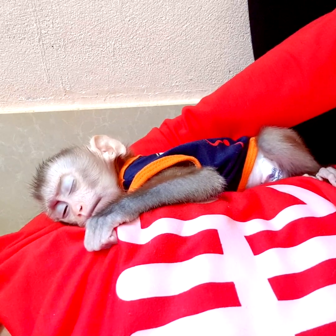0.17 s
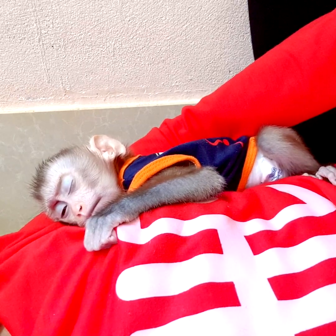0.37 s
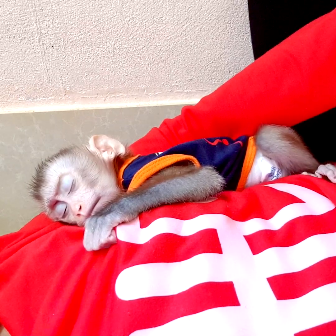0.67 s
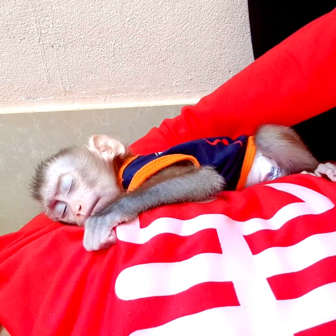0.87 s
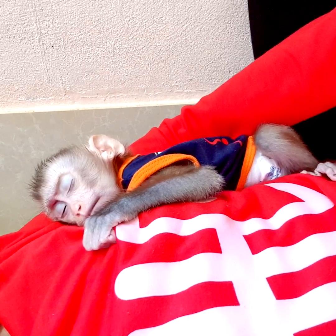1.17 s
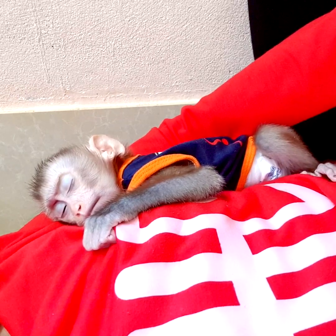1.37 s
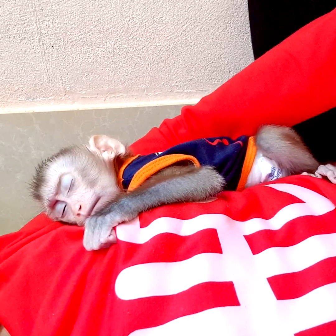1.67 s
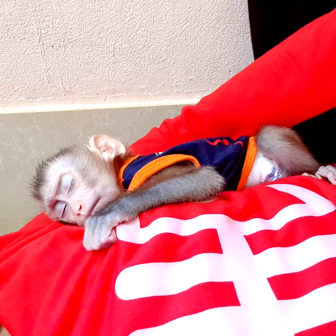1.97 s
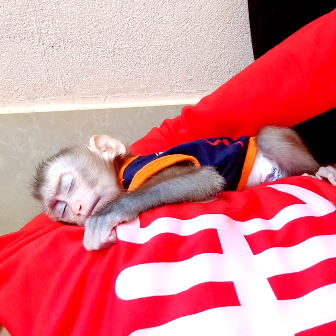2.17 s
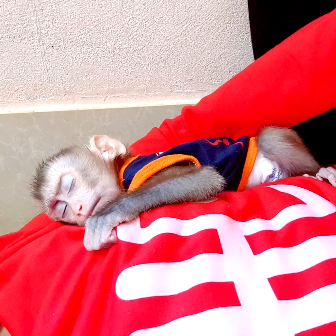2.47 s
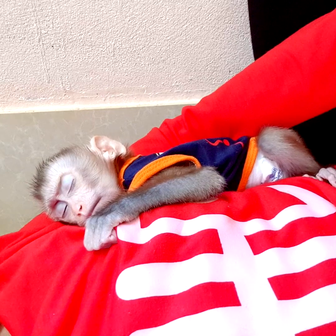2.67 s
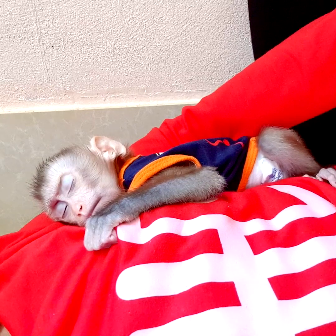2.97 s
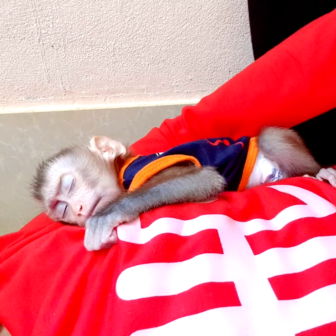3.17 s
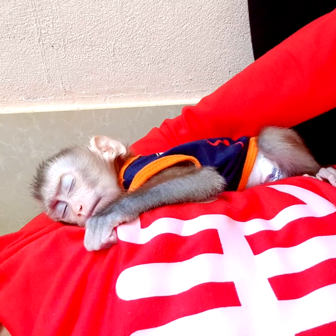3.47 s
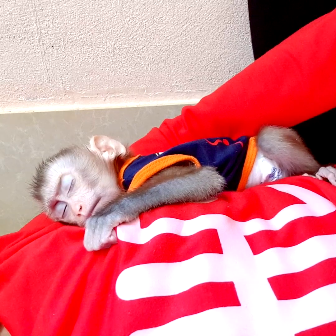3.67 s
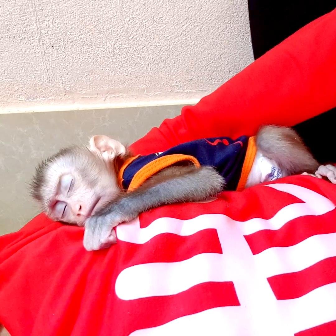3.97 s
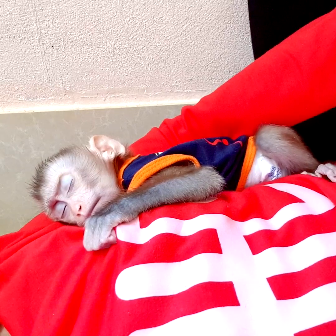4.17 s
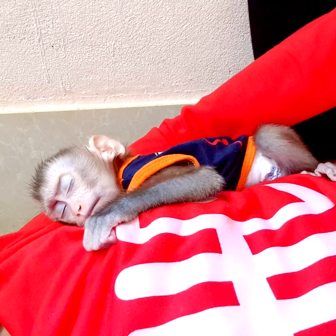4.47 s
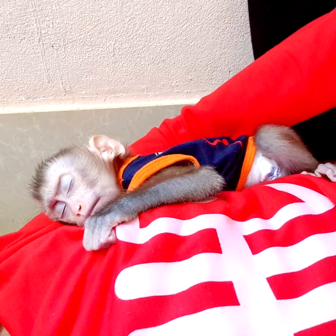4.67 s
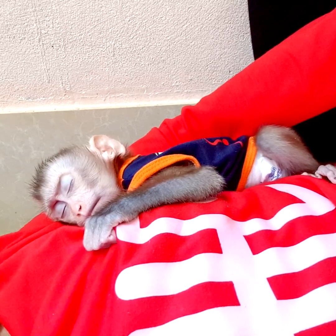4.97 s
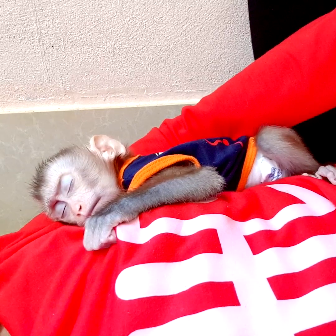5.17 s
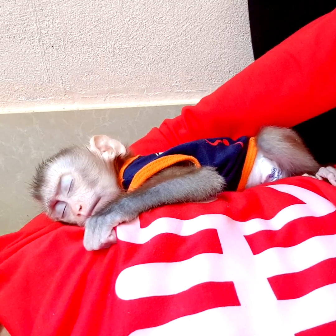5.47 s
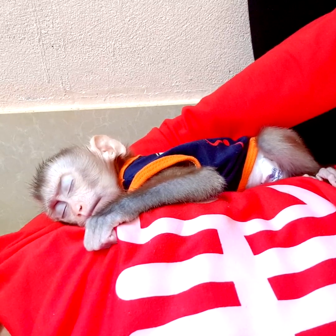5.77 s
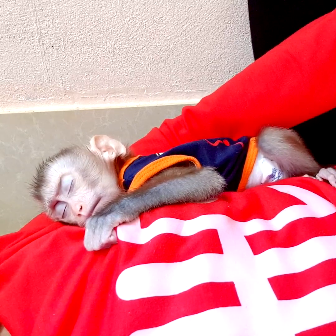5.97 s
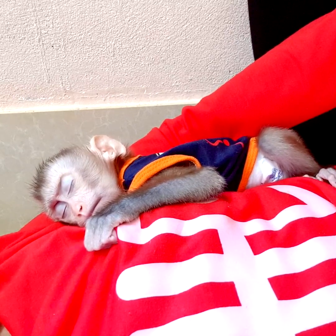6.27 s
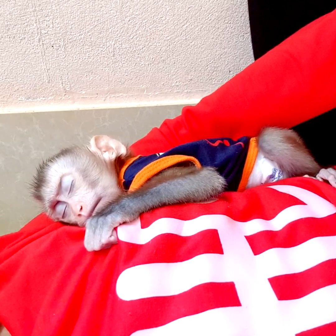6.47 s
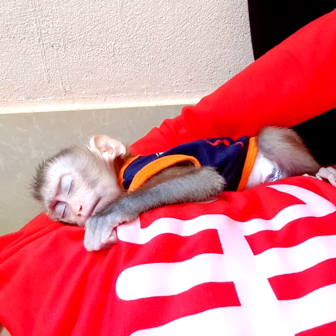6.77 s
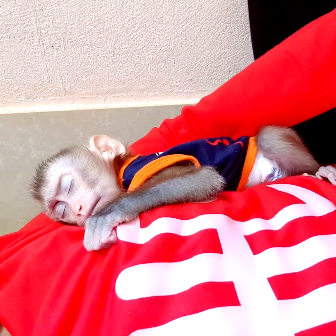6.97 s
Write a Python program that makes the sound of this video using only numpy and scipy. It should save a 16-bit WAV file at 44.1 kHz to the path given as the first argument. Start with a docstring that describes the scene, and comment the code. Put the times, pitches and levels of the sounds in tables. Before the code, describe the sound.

Over a steady fan-like hum, a small monkey some way off cries five times, piercing then hoarse, croaking in between, its calls ringing off hard walls.

```python
"""Throughout, a motor near the microphone, probably a fan, hums and throbs over soft rumbling noise.
First comes the echo of a croak, then, from half a second in, five cries of an animal, probably a
young monkey, some way off in a hard-walled house. Each is a sine-built whistle that climbs and breaks
into noisy rasp; hoarse croaks of straying partials follow, or lead the second cry. A far motor swells
twice early on, faint squeaks of resonant noise fall between, and croaks close the scene."""
import sys
import numpy as np
from scipy import signal
from scipy.fft import rfft, irfft, next_fast_len
from scipy.io import wavfile
from scipy.ndimage import map_coordinates

SR = 44100
rng = np.random.default_rng(int(sys.argv[2]) if len(sys.argv) > 2 else 0)


def dump_mix(stems):
    """Bounce the given channels to the path in sys.argv[1] as a 16-bit WAV at rate SR."""
    frames = np.atleast_2d(stems).T  # one column per channel
    limited = np.clip(frames, -1, 1)  # hard clip at full scale
    pcm = np.round(limited * 32767).astype(np.int16)
    wavfile.write(sys.argv[1], SR, pcm)


N = 313110  # samples


def amp(db):
    """Decibels to gain."""
    return 10 ** (np.asarray(db) / 20)


def unit(x):
    """Scale to rms 1."""
    return x / np.sqrt(np.mean(x ** 2) + 1e-20)


def along(points, hz):
    """Read a curve of (f/Hz, value) points on a log frequency axis."""
    f, value = np.transpose(points)
    return np.interp(np.log(hz + 1), np.log(f + 1), value)


def ramp(x, start, span):
    """0 before the start, rising evenly to 1 over the span."""
    return np.clip((x - start) / max(span, 1e-4), 0, 1)


def wobble(rate, size):
    """A smooth random curve through normally distributed knots, rate knots a second."""
    knots = rng.standard_normal(N // 16)
    return map_coordinates(knots, [np.arange(size) * rate / SR], mode="wrap")


def cycles(hz):
    """Running phase of a moving pitch, in radians."""
    return 2 * np.pi * np.cumsum(hz) / SR


def gate(length, edge):
    """Share of the length gone by, and a window with soft edges (both settings in s)."""
    t = np.arange(int(length * SR)) / SR
    to_nearest_end = np.minimum(t, length - t)
    return t / length, np.sin(np.pi / 2 * np.clip(to_nearest_end / edge, 0, 1))


def filtered(x, response):
    """Shape x by a response of frequency, padded so that the ringing does not wrap round."""
    m = next_fast_len(x.shape[-1] + 8192)
    spectrum = rfft(x, m) * response(np.fft.rfftfreq(m, 1 / SR))
    return irfft(spectrum, m)[..., :x.shape[-1]]


def noise(spectrum, size):
    """Mono coloured noise of rms 1."""
    white = rng.standard_normal(N)[:size]
    return unit(filtered(white, lambda hz: amp(along(spectrum, hz))))


# How alike the two sides of the background noise are: f/Hz, likeness (0 to 1)
LIKENESS = [(40, 0.25), (150, 0.94), (350, 0.91), (700, 0.41), (2000, 0.067), (12000, 0.033)]


def rush(spectrum):
    """Stereo coloured noise of rms 1: shared mid and opposed side set the likeness at each frequency."""
    def mid_and_side_gain(hz):
        turn = np.arccos(np.clip(along(LIKENESS, hz), -1, 1)) / 2
        return amp(along(spectrum, hz)) * [np.cos(turn), np.sin(turn)]

    mid, side = filtered(rng.standard_normal((2, N)), mid_and_side_gain)
    return unit(np.array([mid + side, mid - side]))


# Colour of the noise floor: f/Hz, relative level/dB per Hz
FLOOR_COLOUR = [(120, -17), (220, -5), (300, 1), (520, -2.5), (800, -0.5), (1200, -5), (1900, -12),
                (2500, -16.5), (3200, -27), (4500, -32), (6500, -28), (8500, -42), (11500, -31),
                (15600, -31)]


def noise_floor(level_db=-58):
    """The still air of the place: steady, broad stereo noise."""
    return amp(level_db) * rush(FLOOR_COLOUR)


# Colour of the rumble: f/Hz, relative level/dB per Hz
RUMBLE_COLOUR = [(22, -40), (33, -9), (46, -16), (55, 9.5), (68, 10), (95, 6.5), (128, 3), (160, -6),
                 (220, -9), (330, -52)]


def rumble(level_db=-50, surge_s=2.81, surge_width_s=0.1, surge_db=6):
    """Soft low-frequency stereo noise that surges once."""
    t = np.arange(N) / SR
    surge = np.exp(-((t - surge_s) / surge_width_s) ** 2)
    return amp(level_db + surge_db * surge) * rush(RUMBLE_COLOUR)


# Steady hum lines of the near motor: f/Hz, level/dB
HUM_LINES = [(38.55, -48.5), (100, -60), (174, -68.5), (252, -72.5)]
# Swells of a far motor: t/s of the peak, level/dB at the peak
FAR_SWELLS = [(1.27, -56.5), (2.3, -51.5)]


def motors(blade_db=-46.5, blade_hz=77, throb_hz=3.1, throb_db=2, sway=.8, drone_hz=150.5):
    """Steady hum lines, a blade tone swaying in level and phase, and a far motor that comes and goes."""
    rise_db_per_s, fall_db_per_s = 80, 20.5  # slopes of the far swells
    t = np.arange(N) / SR

    def line(hz, bend=0):
        wander = 0.12 * wobble(2.83, N)  # slow phase drift, radians
        return np.sqrt(2) * np.sin(2 * np.pi * (hz * t + rng.random()) + bend + wander)

    throb = np.sin(2 * np.pi * throb_hz * t)
    blade = amp(blade_db - throb_db * throb) * line(blade_hz, sway * throb)
    hum = sum(amp(db) * line(hz) for hz, db in HUM_LINES)
    swells = np.zeros(N)
    for peak_s, db in FAR_SWELLS:
        below_peak = np.maximum(rise_db_per_s * (peak_s - t), fall_db_per_s * (t - peak_s))
        swells += amp(db - below_peak)
    return blade + hum + swells * line(drone_hz)


# Phase by which the left side leads; negative means it hears the background later: f/Hz, lead/rad
LEFT_LEAD = [(40, -0.44), (70, -0.04), (150, -0.21), (400, -0.54), (1000, -1.77)]


def background():
    """Motors, rumble and floor; the hum sits a little to the right and arrives later on the left."""
    hum = motors() * amp([[-2.2], [1.8]])
    bed = hum + rumble() * amp([[-1], [1]]) + noise_floor()
    return filtered(bed, lambda hz: np.exp(1j * np.outer([1, 0], along(LEFT_LEAD, hz))))


# Reverberation time of the house, a fall of 60 dB: f/Hz, time/s
REVERB_TIME = [(200, 3.4), (1100, 1.15), (2200, 0.85), (4500, 0.72), (8000, 0.34), (15000, 0.11)]


def room(x, direct_db=-10):
    """Little arrives directly; the walls answer differently on each side, and the treble dies first."""
    hz, t, z = signal.stft(rng.standard_normal((2, 3 * SR // 2)), SR, nperseg=256)
    decay = amp(-60 * t / along(REVERB_TIME, hz)[:, None])
    decay = decay / np.linalg.norm(decay, axis=1, keepdims=True)  # even energy across frequency
    tail = signal.istft(z * decay, SR, nperseg=256)[1]
    tail /= np.linalg.norm(tail, axis=1, keepdims=True)
    tail[:, 0] += amp(direct_db)
    return signal.fftconvolve(x[None], tail, axes=1)


# Faint squeaks: t/s, length/s, f/Hz, bandwidth/Hz, dry level/dB before the soft edges
SQUEAKS = [(1.649, 0.12, 4900, 1300, -69), (1.715, 0.075, 1890, 1200, -64.5),
           (3.505, 0.053, 2150, 324, -56), (6.911, 0.15, 4350, 574, -52)]


def squeak(length, hz, width_hz, db):
    """A short rush of air through one resonance."""
    u, window = gate(length, edge=0.029)
    white = rng.standard_normal(N)[:len(u)]
    ring = filtered(white, lambda f: 1 / (1 + ((f - hz) / width_hz * 2) ** 2) ** 0.89)
    return amp(db) * window * unit(ring)


# Croaks: t/s, length/s, dry starting level/dB before the swell-in, fade over the length/dB,
# mouth resonance at start f/Hz, at end f/Hz, its lift/dB, hiss against voice/dB,
# pitch scatter (share of f at 1500 Hz)
CROAKS = [(-.2, .18, -42.5, 5, 1110, 1090, 12, -3.5, 0.012),
          (.851, 0.26, -39, 11.5, 2300, 1150, 6, -3.5, 0.0096),
          (2.235, 0.228, -43.5, 0.5, 1600, 1900, 10.5, -5.5, .02),
          (4.093, 0.27, -41.5, 7.5, 2200, 1600, 6, -5, 0.011),
          (5.297, 0.3, -41, 8, 2230, 1580, 5, -1.5, .01), (6.53, 0.19, -41, 1.5, 855, 774, 8.5, -5, 0.01),
          (6.661, 0.2, -42, 4.5, 2430, 2470, 6.5, -3, 0.009),
          (6.915, 0.13, -47, 9, 1320, 1340, 17, 3, 0.021)]
# Partials of the croak before the mouth lifts them: f/Hz, relative level/dB
CROAK_PARTIALS = [(858, -4), (1020, -8), (1100, -3), (1312, -1), (1618, -8), (1896, -2.5), (2180, -2.5),
                  (2465, -15), (3820, -16), (4110, -16), (4390, -13), (4590, -17)]
# Colour of the croak's breath: f/Hz, relative level/dB per Hz
CROAK_BREATH = [(500, -10), (900, 18), (1400, 13), (2300, 13), (3100, 3), (4500, 3), (6500, 0.5),
                (8000, -9.5), (9500, -20), (11300, -16.5), (15500, -39)]


def croak(length, level_db, fade_db, mouth_start_hz, mouth_end_hz, mouth_db, hiss_db, scatter,
          mouth_octaves=0.51, flicker_db=3, attack_s=0.036):
    """Unsteady partials, lifted near the gliding mouth resonance, over air that swells more slowly."""
    u, window = gate(length, edge=0.014)
    n = len(u)
    mouth_hz = mouth_start_hz * (mouth_end_hz / mouth_start_hz) ** u
    voice = np.zeros(n)
    for hz, db in CROAK_PARTIALS:
        lift = mouth_db * np.exp(-(np.log2(hz / mouth_hz) / mouth_octaves) ** 2)
        stray_hz = scatter * np.sqrt(hz * 1500) * wobble(157.2, n)  # high partials stray further
        level = amp(db + lift + flicker_db * wobble(26.9, n))
        voice += level * np.sin(cycles(hz + stray_hz))
    air_swell = gate(length, edge=0.047)[1]
    air = amp(hiss_db) * air_swell * noise(CROAK_BREATH, n)
    envelope = window * ramp(u * length, 0, attack_s) * amp(level_db - fade_db * u)
    return envelope * (unit(voice) + air)


# Cries: t/s, length/s, top pitch f/Hz, then dry levels before the envelopes: whistle level/dB,
# rasp level/dB, hiss level/dB; lift of overtones above the second/dB, extra whistle loss at the end/dB
CRIES = [(0.54, .315, 1139, -28, -36.5, -40.5, 1, 20), (2.407, .44, 1144, -27, -37, -43.5, -0.5, -2),
         (3.835, .28, 1140, -28.5, -36, -42.5, -1.5, 29), (5.025, .3, 1146, -28, -35, -40.5, 3, 36),
         (6.21, 0.302, 1138, -28.5, -35.5, -41, 1.5, 16)]
# Overtones of the whistle before they brighten or dull: multiple of the pitch, relative level/dB
WHISTLE_OVERTONES = [(1, 0), (2, -8.5), (3, -15), (4, -21), (5, -31), (6, -37), (7, -42), (8, -46),
                     (9, -43), (10, -45)]
# Side tones of the flutter before they waver: flutter steps from the whistle, relative level/dB
FLUTTER_TONES = [(6, -52), (-8, -24), (0, 13), (1, -3), (3, 7), (17, -25), (7, 16.5)]
# Colour of the rasp: f/Hz, relative level/dB per Hz
RASP_COLOUR = [(300, -17), (560, -10.5), (740, -13.5), (860, 2), (1080, 7), (1320, -4), (1480, -17),
               (1640, -22.5), (1900, -1), (2200, -25.5), (2500, -11), (3600, -15), (6000, -61)]
# Colour of the cry's breath: f/Hz, relative level/dB per Hz
CRY_BREATH = [(600, -53), (1000, 17), (2500, 1.5), (4000, -1), (5500, -1.5), (6800, -6.5), (8500, -13.5),
              (11000, -15.5), (12500, -25), (15500, -65)]

# Pitch starts a share below the top, climbs, holds, and sags by a share as the voice gives way
SCOOP, CLIMB_S, SAG = .085, .12, 0.0546
# Effort swells, holds up to a share of the length, then lets go
ATTACK_S, ATTACK_DB, HOLD, RELEASE_DB = 0.057, 9.5, 0.594, 7
# Treble blooms later, fast at first; hiss comes up from further down and overtones start weak
BLOOM_S, BLOOM_CURVE, HISS_ATTACK_DB, DULL_DB_PER_OCTAVE = 0.18, 2.15, 22, 5
# The whistle starts soft, jumps to full voice, and tires all the while
JUMP_S, JUMP_EDGE_S, SOFT_DB, TIRE_DB_PER_S = 0.091, 0.0034, 11, 56
# Flutter sets in, then rasp, at shares of the length; both lie CLEAN_DB lower before that
FLUTTER_AT, RASP_AT, BREAK_SPAN, CLEAN_DB = 0.15, 0.71, 0.072, 10
FLUTTER_DB, RASP_FLARE_DB = -43, 3  # side tones before effort; size of the rasp's uneven flares


def cry(length, top_hz, whistle_db, rasp_db, hiss_db, shrill_db, loss_db, flutter_hz=164, brighten=0.18):
    """A whistle climbs and brightens; a slower flutter adds side tones as it breaks into a rasp."""
    u, window = gate(length, edge=0.015)
    n, t = len(u), u * length

    # Level curves in dB
    weak, spent = 1 - ramp(t, 0, ATTACK_S), ramp(u, HOLD, 1 - HOLD)
    effort = -ATTACK_DB * weak - RELEASE_DB * spent
    soft_start = SOFT_DB * (1 - ramp(t, JUMP_S, JUMP_EDGE_S))
    tiring = TIRE_DB_PER_S * (t - ATTACK_S)
    tone_db = effort - soft_start - tiring - loss_db * spent
    side_db = effort - CLEAN_DB * (1 - ramp(u, FLUTTER_AT, BREAK_SPAN))
    rasp_curve = effort - CLEAN_DB * (1 - ramp(u, RASP_AT, BREAK_SPAN))
    dull = (1 - ramp(t, 0, BLOOM_S)) ** BLOOM_CURVE
    hiss_curve = -HISS_ATTACK_DB * dull - RELEASE_DB * spent

    pitch = 1 - SCOOP * (1 - ramp(t, 0, CLIMB_S)) - SAG * spent
    jitter = .004 + .1 * np.abs(1 - pitch)  # steadiest while held at the top
    phase = cycles(top_hz * pitch * (1 + jitter * wobble(267.6, n)))
    beat = cycles(flutter_hz * (1 + 0.037 * wobble(122.5, n)))

    whistle = np.zeros(n)
    for k, db in WHISTLE_OVERTONES:
        # overtones grow with the air flow, the higher the more
        lift = np.log2(k) * (brighten * effort - DULL_DB_PER_OCTAVE * dull) + shrill_db * (round(k) > 2)
        whistle += amp(db + lift) * np.sin(round(k) * phase)
    sides = np.zeros(n)
    for k, db in FLUTTER_TONES:
        level = amp(db + 7.3 * wobble(13.1, n))
        sides += level * np.sin(phase + round(k) * beat + 2 * np.pi * rng.random())

    flares = RASP_FLARE_DB * wobble(46, n)
    rasp = amp(rasp_db + rasp_curve + flares) * noise(RASP_COLOUR, n)
    hiss = amp(hiss_db + hiss_curve) * noise(CRY_BREATH, n)
    voice = amp(whistle_db + tone_db) * unit(whistle) + amp(FLUTTER_DB + side_db) * unit(sides)
    return window * (voice + rasp + hiss)


def add(out, s, sound):
    """Mix a stereo sound in at s seconds; a start before zero leaves only what is still sounding."""
    start = round(s * SR)
    sound = sound[:, max(-start, 0):N - start]
    out[:, max(start, 0):][:, :sound.shape[1]] += sound


def scene():
    """Squeaks, croaks and cries echo through the house, a touch to the right, over the background."""
    calls = np.zeros((2, N))
    for source, table in (squeak, SQUEAKS), (croak, CROAKS), (cry, CRIES):
        for s, *settings in table:
            add(calls, s, room(source(*settings)))
    return calls * amp([[-.4], [.4]]) + background()


def record(dry, top_hz=15700):
    """Fade in and out within milliseconds; nothing is kept above the band limit."""
    t = np.arange(N) / SR
    fade = np.clip(np.minimum(t, t[::-1]) / .004, 0, 1)
    return filtered(dry * fade, lambda hz: hz < top_hz)


dry = scene()
out = record(dry)
dump_mix(out)
```